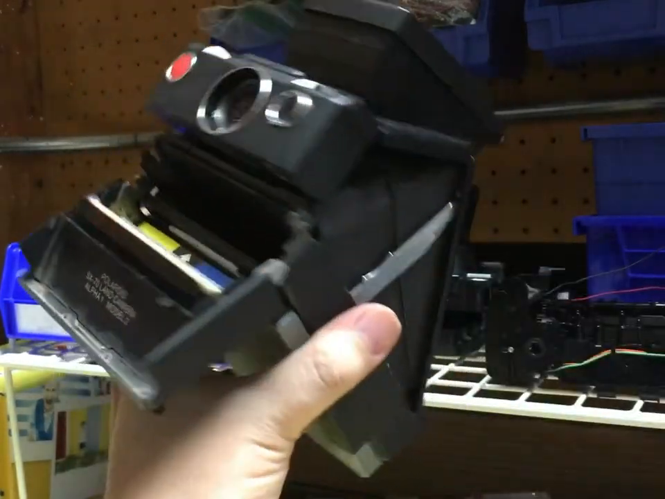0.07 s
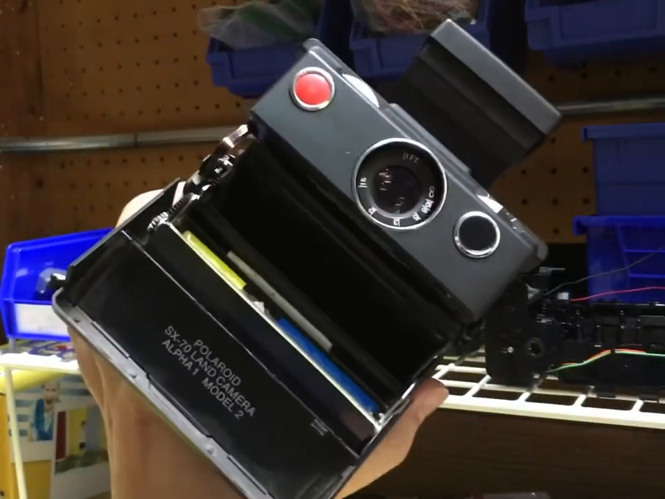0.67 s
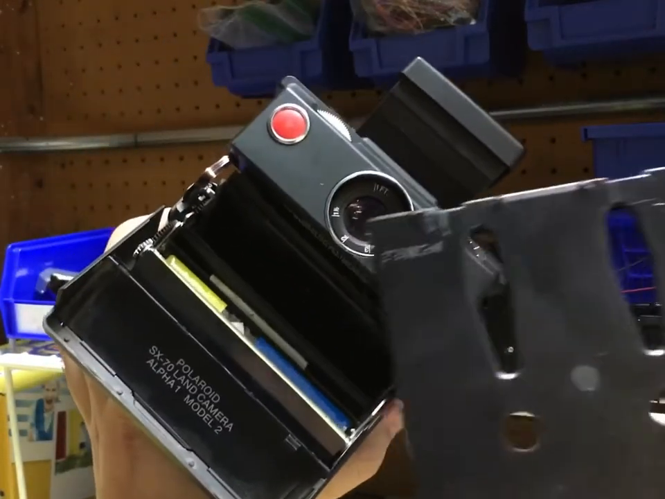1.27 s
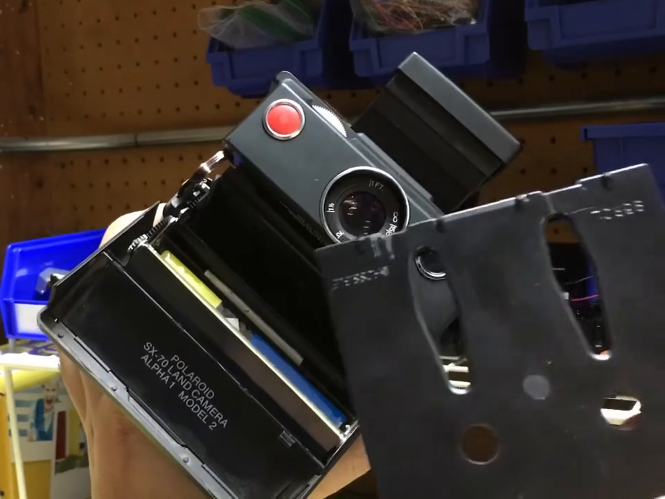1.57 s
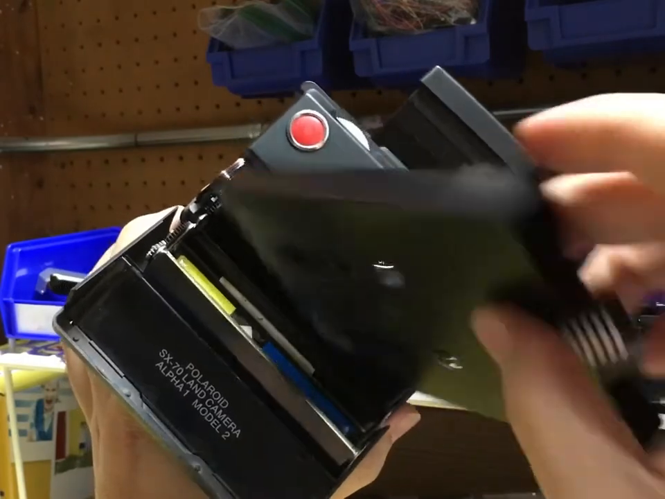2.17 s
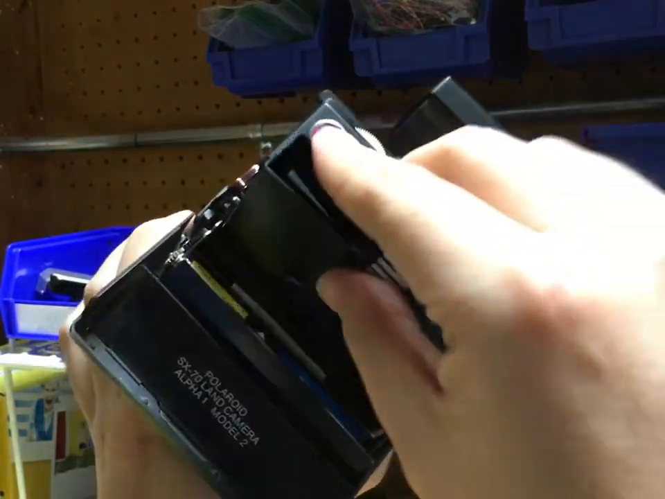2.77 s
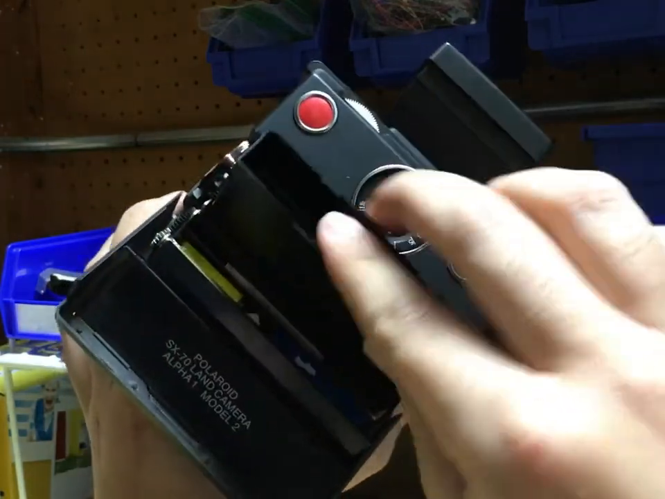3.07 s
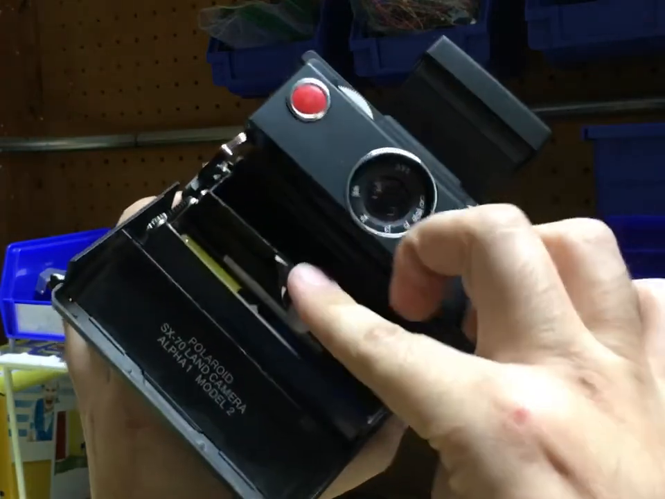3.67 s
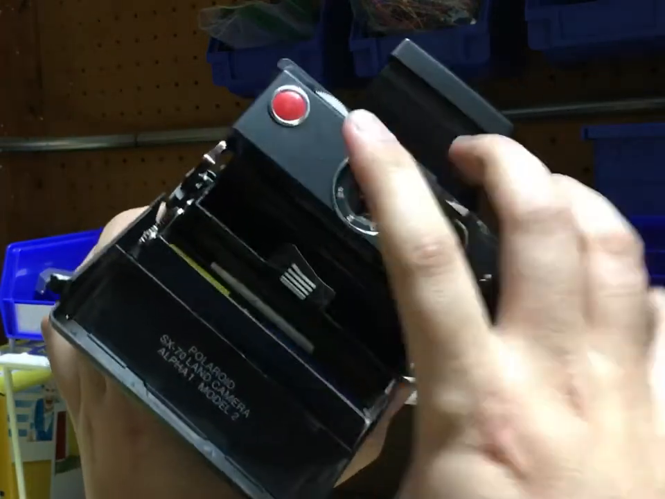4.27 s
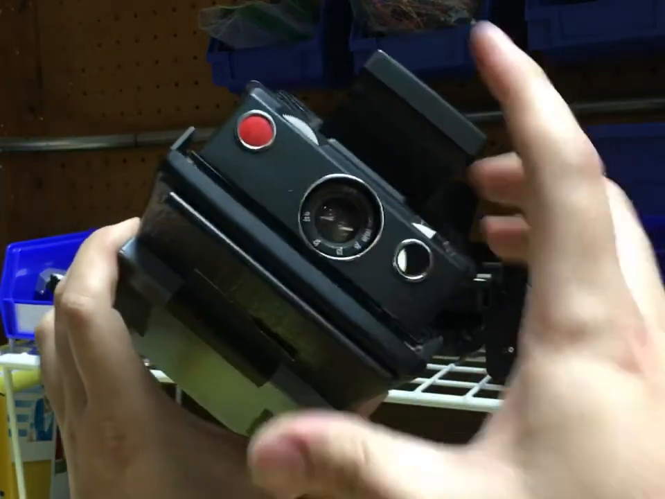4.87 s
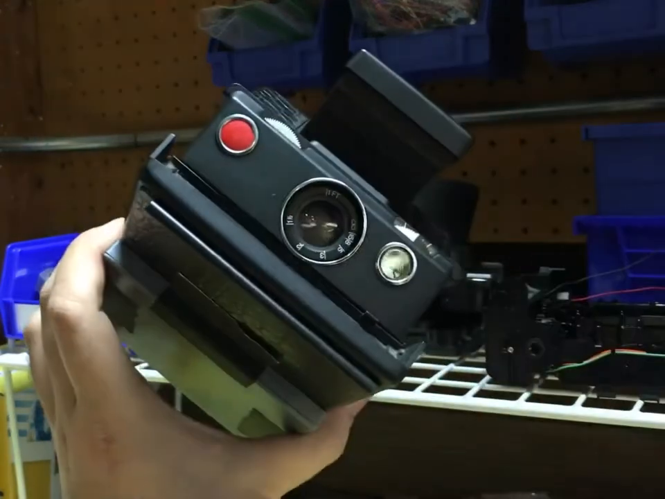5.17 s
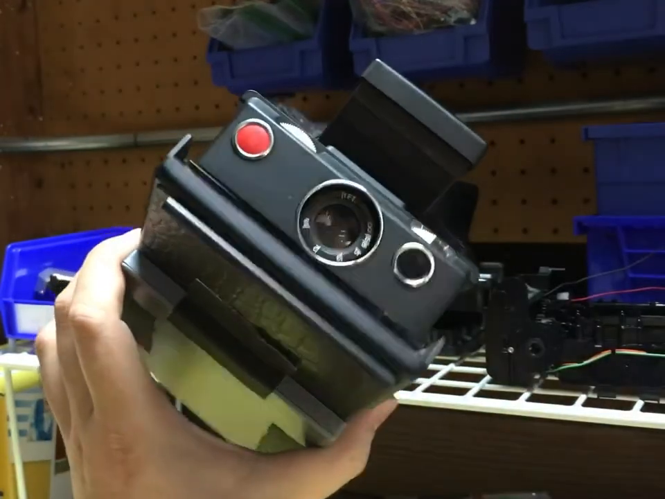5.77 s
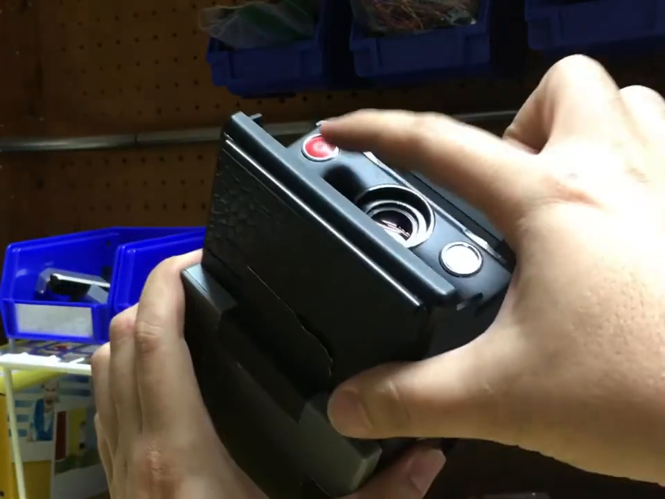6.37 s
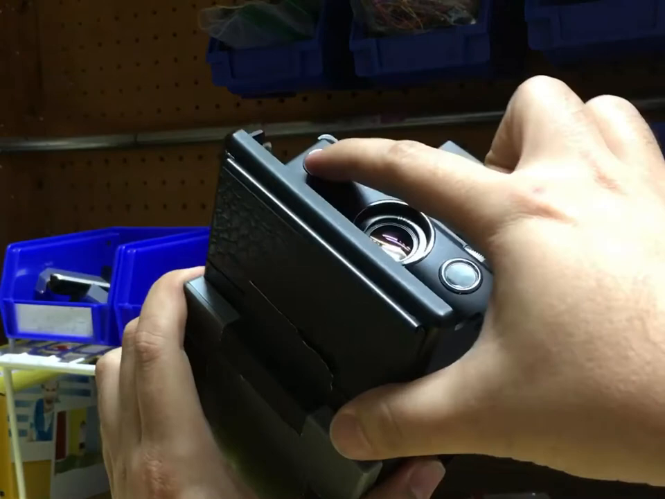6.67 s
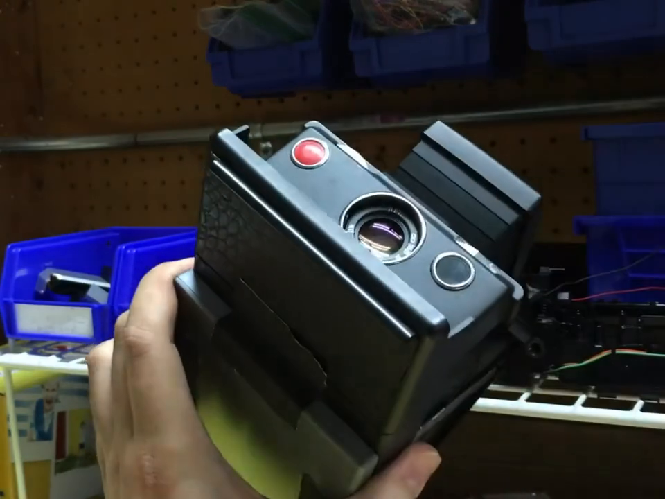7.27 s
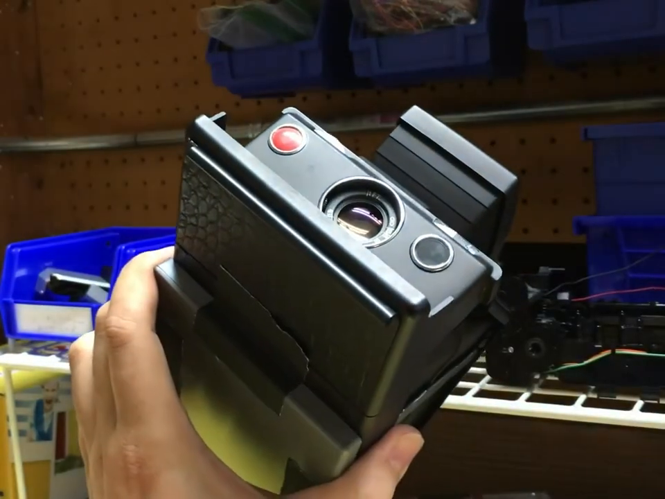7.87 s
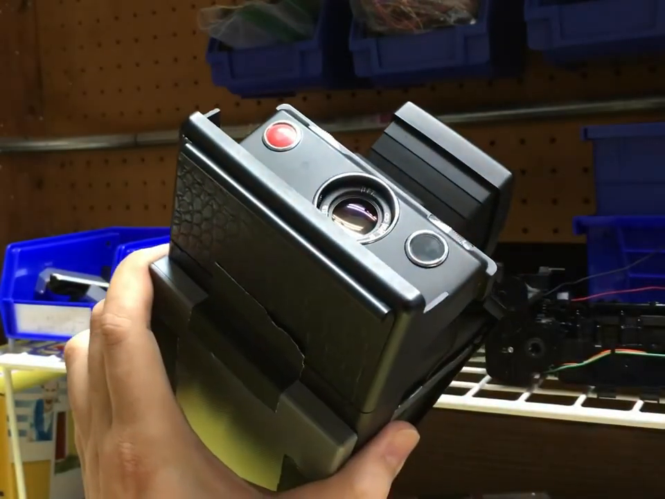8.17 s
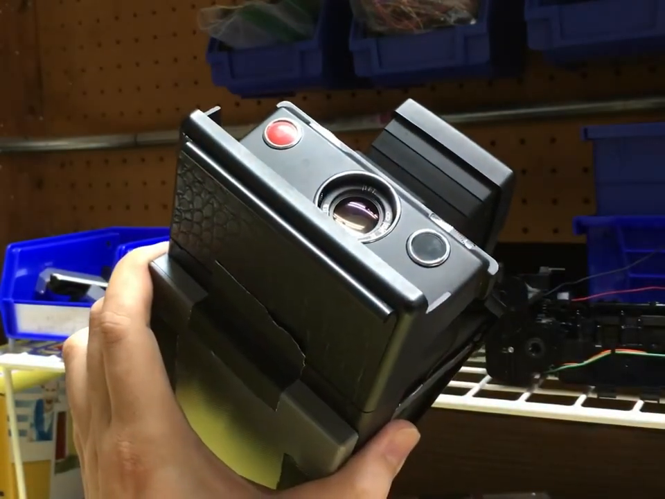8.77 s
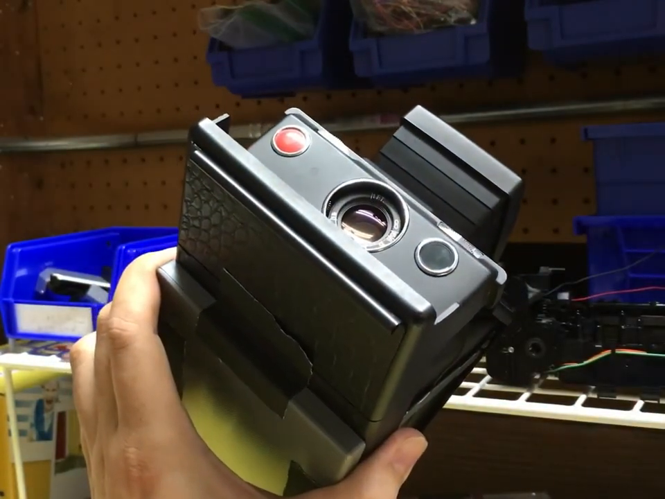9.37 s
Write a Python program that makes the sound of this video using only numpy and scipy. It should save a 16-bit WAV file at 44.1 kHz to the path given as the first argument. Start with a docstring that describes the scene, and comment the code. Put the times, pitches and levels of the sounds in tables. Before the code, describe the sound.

Light plastic scrapes and uneven clicks come from close by as a battery holder is pushed into an instant camera. A hard snap closes the door and sets off a bright, whining gear rattle that stops with a sharp tick. A short motor burst and a few knocks follow. After a moment of quiet workshop hum, the shutter ticks and the motor whirs again.

```python
"""A small workshop, bench equipment humming and whining faintly. Close up, a folding instant camera is
handled: its door drops open, a plastic battery holder scrapes and clicks into the slot, the door snaps
shut. Each contact excites the crowded modes of the plastic shell. A small motor then drives the gear
train in four runs, its teeth whining and rattling through the housing, with bright shutter ticks and
low mirror thuds."""
import sys
import numpy as np
from scipy import signal
from scipy.fft import rfft, irfft, next_fast_len
from scipy.io import wavfile
from scipy.ndimage import map_coordinates

SR = 44100
rng = np.random.default_rng(int(sys.argv[2]) if len(sys.argv) > 2 else 0)


def dump_mix(stems):
    """Bounce the given channels to the path in sys.argv[1] as a 16-bit WAV at rate SR."""
    frames = np.atleast_2d(stems).T  # one column per channel
    limited = np.clip(frames, -1, 1)  # hard clip at full scale
    pcm = np.round(limited * 32767).astype(np.int16)
    wavfile.write(sys.argv[1], SR, pcm)


N = 420273
TIME = np.arange(N) / SR


def from_db(db):
    """Decibels to gain."""
    return 10 ** (np.asarray(db) / 20)


def rms_one(x):
    """Scale to unit rms."""
    return x / np.sqrt(np.mean(x ** 2) + 1e-20)


def cut(x, hz, kind, order=2):
    """Causal low-, high- or band-pass."""
    sos = signal.butter(order, np.clip(hz, 10, .45 * SR), kind, fs=SR, output="sos")
    return signal.sosfilt(sos, x + 1e-18)


def drift(rate):
    """Smooth random wander, rms 1, through `rate` points a second."""
    knots = rng.standard_normal(N // 20)
    return rms_one(map_coordinates(knots, [TIME * rate + 2], order=3, mode="nearest"))


def noise(spectrum):
    """Noise of the given colour, rms 1."""
    hz, db = np.transpose(spectrum)
    size = next_fast_len(N)
    bins = np.arange(size // 2 + 1) * SR / size
    colour = from_db(np.interp(np.log(bins + 1), np.log(hz), db))
    return rms_one(irfft(rfft(rng.standard_normal(size)) * colour, size)[:N])


def resonance(x, hz, width):
    """One resonance, gain 1 at its top."""
    r = np.exp(-np.pi * width / SR)
    feedback = [1, -2 * r * np.cos(2 * np.pi * hz / SR), r * r]
    return signal.lfilter(np.array([1, 0, -1]) * (1 - r * r) / 2, feedback, x + 1e-18)


def resonate(x, peaks):
    """The sound plus what it excites in a few resonances."""
    return x + sum(from_db(db) * resonance(x, hz, width) for hz, width, db in peaks)


def diffuse(x, t60, top_hz, gap_s):
    """A tail of dense reflections, its impulse response of unit energy."""
    t = TIME[:SR // 2]
    reflections = rng.standard_normal(len(t)) * from_db(-60 * t / t60) * (t > gap_s)
    tail = cut(reflections, top_hz, "low", order=1)
    return signal.fftconvolve(x, tail / np.sqrt(np.sum(tail ** 2)))[:N]


def swell(age, length, attack_s, release_s):
    """Envelope that rises, holds for the given length and dies away."""
    return (1 - np.exp(-age / attack_s)) * np.exp(-np.maximum(age - length, 0) / release_s)


def decays(times, levels_db, t60s, rise=0.00077):
    """Envelope of fast-rising blows that die away; overlaps add in power."""
    power = np.zeros(N)
    for s, db, t60 in np.broadcast(times, levels_db, t60s):
        tail = power[int(s * SR):][:SR // 2]
        t = TIME[:len(tail)]
        tail += (from_db(db - 60 * t / t60) * (1 - np.exp(-t / rise))) ** 2
    return np.sqrt(power)


def mode(s, hz, db, t60):
    """One struck mode, ringing from time s for half a second at most."""
    out = np.zeros(N)
    tail = out[int(s * SR):][:SR // 2]
    t = TIME[:len(tail)]
    tail += from_db(db - 60 * t / t60) * np.sin(2 * np.pi * hz * t)
    return out


def workshop(air_db=-53, throb_hz=56.8):
    """Room tone: still air, bench hum and a thin whine; a second low hum beats with the first."""
    # colour of the air: (frequency [Hz], relative level [dB])
    air_colour = [(25, -16), (45, 13.5), (62, 19.5), (80, -4), (130, 10), (170, -9), (280, 2.5), (450, -10),
                  (800, -10.5), (1200, -7.5), (2800, -3), (4800, -12.5), (6000, -12), (9500, -18),
                  (15600, -8.5)]
    # bench hum and whine: (frequency [Hz], rms level [dB])
    bench_tones = [(60, -52.5), (123.8, -57), (1130, -61), (2261, -70.5), (3012, -71)]
    # fader curve of the second hum: (time [s], rms level [dB])
    throb_curve = [(0, -62), (4.5, -61), (5.8, -57), (6.4, -50), (7.3, -51), (9.5, -54)]
    air = noise(air_colour)
    air *= from_db(air_db) / np.std(cut(air, 300, "high", order=4))  # air_db is the level above 300 Hz
    hum = sum(from_db(db) * np.sin(2 * np.pi * hz * TIME + 0.92 * drift(4.0)) for hz, db in bench_tones)
    throb = from_db(np.interp(TIME, *np.transpose(throb_curve))) * np.sin(2 * np.pi * throb_hz * TIME)
    return air + np.sqrt(2) * (hum + throb)


def shell_bands():
    """The crowded modes of the plastic shell as bass, mids and treble noise, rms 1 each."""
    # shell resonances: (frequency [Hz], width [Hz], gain [dB])
    shell_peaks = [(1060, 240, 6.5), (1830, 370, -4), (2840, 70, 2.5), (4030, 2100, -1), (5660, 610, 1),
                   (6700, 570, 1), (8900, 660, -1.5), (12600, 3100, 0.5)]
    dense = resonate(rng.standard_normal(N), shell_peaks)
    bass = cut(dense, [170, 700], "band")
    mids = cut(dense, [750, 3500], "band", order=3)
    treble = cut(dense, 6400, "high")
    return rms_one(bass), rms_one(mids), rms_one(treble)


def rubbing(shell, grain_db=1.0, slip_db=2.0, bass_db=-7, edge_db=5, edge_width_hz=260):
    """Surfaces catch and slip in uneven grains that excite the shell and the edge being rubbed."""
    # hands and holder slide: (start [s], length [s], treble [dB], mids [dB], edge ring [Hz])
    strokes = [(0, 0.097, -44, -45, 3000), (0.131, 0.044, -52, -42.5, 2680), (0.24, 0.027, -54, -50, 1750),
               (0.345, 0.021, -48, -46, 1400), (0.392, 0.019, -51, -50, 1500),
               (0.418, 0.2, -46.5, -51, 3660), (0.559, 0.077, -39, -35.5, 3700),
               (0.759, 0.08, -46.5, -54.5, 2870), (1.752, 0.029, -50, -50.5, 1800),
               (1.825, 0.11, -48, -53.5, 3600), (1.949, 0.0053, -35.5, -45, 3600),
               (2.068, 0.022, -36, -37.5, 3000), (2.456, 0.027, -53, -51, 3650),
               (2.598, 0.099, -43.5, -44, 1880), (2.7, .028, -36, -42, 1870),
               (2.828, 0.056, -54.5, -51, 1780), (2.903, 0.061, -46, -49.5, 1930),
               (3.025, 0.029, -43, -49, 1600), (3.106, 0.084, -46.5, -51, 1570),
               (3.201, 0.013, -42, -49, 1900), (3.313, 0.024, -51, -56, 1050),
               (3.349, 0.0068, -43, -50, 2780), (3.476, .028, -38, -47.5, 1900),
               (3.509, 0.006, -46, -35, 1860), (3.54, 0.059, -54, -56, 930),
               (4.353, 0.094, -54, -53.5, 1810)]
    # palm and fingers shift their grip: (middle [s], half length [s], level [dB])
    grips = [(0.423, 0.17, -48), (3.107, 0.35, -59.5)]
    bass, mids, treble = shell
    body = mids + from_db(bass_db) * bass
    grains = rms_one(from_db(grain_db * drift(700) + slip_db * drift(90)))
    out = np.zeros(N)
    for s, length, treble_db, mids_db, edge_hz in strokes:
        on = slice(int(s * SR), int(s * SR) + SR // 3)
        pressure = grains[on] * swell(TIME[:SR // 3], length, attack_s=0.0043, release_s=0.01)
        scrape = pressure * (from_db(treble_db) * treble[on] + from_db(mids_db) * body[on])
        out[on] += resonate(scrape, [(edge_hz, edge_width_hz, edge_db)])
    grip = sum(from_db(db) * np.exp(-((TIME - s) / half) ** 2) for s, half, db in grips)
    return out + grip * rms_one(cut(bass, 250, "low"))


def taps(shell, per_s=26, softest_db=-61, spread_db=8, treble_db=-5, bass_db=-3, ring_db=-2,
         low_hz=1100, high_hz=2100):
    """Light, uneven taps of the holder in its slot, each with a short ring of its own."""
    # fingers press the holder home: (start [s], end [s])
    fumble = (2.75, 3.75)
    start, end = fumble
    bass, mids, treble = shell
    count = int(per_s * (end - start))
    jitter, size, pitch = rng.random((count, 3)).T
    times = start + (np.arange(count) + jitter) / per_s
    levels = softest_db - spread_db * np.log(size)  # mostly soft, a few stand out
    ring_hz = low_hz * (high_hz / low_hz) ** pitch
    plastic = mids + from_db(treble_db) * treble + from_db(bass_db) * bass
    rings = sum(mode(*ring, t60=0.11) for ring in zip(times, ring_hz, levels + ring_db))
    return plastic * decays(times, levels, t60s=0.029) + rings


def knocks(shell, crack_db=-7, treble_db=-11, mids_db=1, bass_db=2, rise_s=0.0024):
    """Plastic hits plastic: a sharp crack, the shell's brief clatter and the ring of the struck part."""
    # knocks before the band trims: (time [s], level [dB], bass re level [dB], mids re level [dB],
    # ring [Hz], ring re mids [dB], clatter t60 [s])
    hits = [(0.1091, -9.5, -17, -10.5, 1646, -3, 0.11), (0.1302, -7, -21, -19.5, 4700, 9.5, 0.047),
            (0.5753, -31, -23, -7, 3500, 12, 0.065), (0.604, -11.5, -14, -17, 2940, -6, 0.064),
            (0.6294, -29.5, -4, -4, 3500, 2, 0.04), (1.9913, -16.5, -12, -8.5, 979, 11, 0.055),
            (2.0547, -13, -16, -17.5, 4160, -1, 0.051), (2.0842, -12.5, -22, -13, 1610, -1.5, 0.055),
            (2.123, -24.5, -6, -6, 1590, -4, 0.059), (2.337, -28, -5, -2, 950, -5, 0.05),
            (2.4985, -8, -15, -16.5, 5630, 11, 0.068), (2.651, -26.5, -36, -3.5, 1070, -6, 0.042),
            (2.7205, -23.5, -37, -3.5, 1710, -0.5, 0.071), (3.3615, -20.5, -33, -23.5, 2810, 16.5, 0.018),
            (3.5071, -11, -25, -5, 1007, -4, 0.04), (3.964, -16, -24, -11, 1944, 3, 0.055),
            (4.412, -17.5, -28, -14.5, 1130, -6, 0.025), (4.434, -21, -11.5, -11, 1090, -25, 0.091),
            (4.5219, 1, -17, -10.5, 922, -10.5, 0.059), (4.53, -10.5, -13, -3.5, 2116, 1.5, 0.026),
            (4.536, -5, -21, -24, 2730, 15, 0.034), (4.6906, -19, -11.5, -11, 5440, -6, 0.14),
            (4.781, -12, -12, -7.5, 5930, -3, 0.05), (6.7502, -9, -20, -15.5, 5080, -14, 0.083),
            (6.8336, -11.5, -14, -13, 1406, -6, 0.093), (6.911, -24.5, -35, -31, 5230, -7, 0.06)]
    s, level, bass_rel, mids_rel, ring_hz, ring_db, t60 = np.transpose(hits)
    bass, mids, treble = shell
    crack = treble * decays(s, level + crack_db, t60s=0.015, rise=0.00056)
    clatter = treble * decays(s, level + treble_db, t60, rise_s)
    clatter += mids * decays(s, level + mids_rel + mids_db, t60, rise_s)
    weight = bass * decays(s, level + bass_rel + bass_db, t60s=0.068, rise=0.011)
    # edges graze each other just before they snap home
    graze = treble * decays(s - .009, np.minimum(level - 27, -46), t60s=.05)
    ring_t60 = 0.071 * np.minimum(1, 1200 / ring_hz)  # high rings die sooner
    rings = sum(mode(*ring) for ring in zip(s, ring_hz, level + mids_rel + ring_db, ring_t60))
    return crack + clatter + weight + graze + rings


def thuds(modes_db=-9, push_db=-8):
    """Door and mirror thud: low body modes, a boom and a push of noise; a softer contact is duller."""
    # blows: (time [s], level [dB], contact cut-off [Hz], boom [Hz], boom re level [dB])
    blows = [(.111, -31.5, 1300, 574, 8.5), (4.527, -20.5, 495, 185, -1), (4.78, -18, 850, 164, -7.5),
             (5.214, -25.5, 650, 383, 2), (5.232, -24, 650, 230, -18), (6.833, -15, 820, 173, -18),
             (7.31, -23.5, 680, 410, 0)]
    # modes of the camera body: (frequency [Hz], relative level [dB], t60 [s])
    body_modes = [(179, -0.5, 0.093), (211, 1, 0.056), (271, 1.5, 0.098), (412.5, -1, 0.047),
                  (480, -10, 0.098), (580, 6.5, 0.018), (704, 1.5, 0.086), (1090, -17.5, 0.093)]
    dull_noise = noise([(90, -36), (190, 7), (600, -8.5), (1500, -6.5), (8000, -8)])
    out = np.zeros(N)
    for s, db, contact_hz, boom_hz, boom_db in blows:
        body = sum((-1) ** k * mode(s, hz, db + modes_db + level + rng.normal(0, 1), t60)
                   for k, (hz, level, t60) in enumerate(body_modes))
        boom = mode(s, boom_hz, db + boom_db, t60=0.056)
        push = dull_noise * decays(s, db + push_db, t60s=0.14)
        out += cut(body + boom + push, contact_hz, "low", order=3)
    return out


def ticks(crack_db=-4, sizzle_db=-11, ring_hz=2520, ring_db=-22):
    """Small steel parts snap: a very bright crack, a brief sizzle and one short ring."""
    # shutter and switch ticks: (time [s], level [dB])
    snaps = [(6.0932, -4.5), (6.137, -23.5), (6.5822, -16.5), (6.5912, -6.5), (8.0895, -17.5), (8.098, -5)]
    s, level = np.transpose(snaps)
    steel = noise([(200, -14), (1300, -18), (2000, -0.5), (4000, -2.5), (5500, 4.5), (9000, 4),
                   (14000, 7.5)])
    crack = decays(s, level + crack_db, t60s=0.015, rise=0.00051)
    sizzle = decays(s, level + sizzle_db, t60s=0.067)
    rings = sum(mode(at, ring_hz, db + ring_db, t60=0.038) for at, db in snaps)
    return steel * (crack + sizzle) + rings


def spring(at_s=6.095):
    """A spring rings on as the first long motor run ends."""
    # spring modes: (frequency [Hz], level [dB], t60 [s])
    spring_modes = [(1750, -55, 1.55), (2880, -54.5, 1.5)]
    return sum(mode(at_s, *ring) for ring in spring_modes)


def wander(age, rate):
    """Random wander along a motor run, through `rate` points a second."""
    return np.interp(age * rate, np.arange(2000), rng.standard_normal(2000))


def gear_whine(age, mesh_hz, level_db, rotor_db, tilt_db, full_hz=1196, rotor_ratio=.15, growl_db=-5):
    """Meshing teeth sing over the rotor's low tone, louder with speed."""
    # drive tones: (multiple of the mesh rate, relative level [dB], phase wander [rad])
    orders = [(.45, -12.5, 0.13), (.5, -13.5, 0.13), (0.584, -14.5, 0.58), (1, -1, 0.34),
              (1.065, -9.5, 0.96), (1.5, 0, 1.22), (1.901, -12.5, 1.2), (2, -3.5, 0.82), (2.5, -3.5, 0.87)]
    unsteady = .002 + .25 * np.exp(-age / .08)  # the teeth mesh unevenly while spinning up
    phase = 2 * np.pi * np.cumsum(mesh_hz * (1 + unsteady * wander(age, 298.4))) / SR
    tones = from_db(rotor_db) * np.sin(rotor_ratio * phase)
    for multiple, db, loose in orders:
        load_db = tilt_db * max(np.log2(multiple), 0)  # a harder load brightens the upper tones
        gain = from_db(db + load_db + 3.14 * wander(age, 34.96))
        tones += gain * np.sin(multiple * phase + loose * wander(age, 110))
    speed_db = 5 * np.log2(mesh_hz / full_hz)
    engaged = 1 - np.exp(-age / .09)  # the tone forms once the backlash is taken up
    # the first gear growls at half the mesh rate while it speeds up
    growl = from_db(growl_db) * np.exp(-age / 0.074) * np.sin(phase / 2)
    return from_db(level_db) * (from_db(speed_db) * engaged * tones + growl)


def gear_chatter(age, level_db, bounce_hz=94, settle_s=0.021, grain_db=0.5, attack_s=0.001):
    """Envelope of the rattle: the gears bounce in their backlash until the load settles."""
    pulses = 1.8 * np.exp(-4 * (age * bounce_hz % 1))
    bounce = 1 + np.exp(-age / settle_s) * (pulses - 1)
    return from_db(level_db + grain_db * wander(age, 610)) * (1 - np.exp(-age / attack_s)) * bounce


def housing(gears, age, wander_db=6, wanders_per_s=8.9):
    """The gears excite housing resonances, each strongest at its own point of the cam's turn."""
    # resonances: (frequency [Hz], width [Hz], gain [dB], strongest after the start [s], half length [s])
    housing_peaks = [(2285, 95, -0.5, 0.54, 1), (4300, 156, -3, 0.63, 1.5), (6100, 83, 1.5, .2, 0.63),
                     (6460, 370, 2, 1.3, 0.27), (9600, 590, -0.5, .28, .33), (14300, 900, -8, 1.1, 0.39)]
    out = np.zeros(len(age))
    for hz, width, db, at, span in housing_peaks:
        gain = from_db(db + wander_db * wander(age, wanders_per_s)) * np.exp(-((age - at) / span) ** 2)
        out += resonance(gears * gain, hz, width)
    return out


def motor(run, rattle, start_lag=.42, spin_up_s=.045, coast_s=0.086, fade_t60=0.095, panel_width_hz=220):
    """One run: the motor spins up to the rate the load allows and coasts down when the power is cut."""
    # gear mesh rate that the load allows, one curve for each of the two cycles: (time [s], rate [Hz])
    mesh_curves = [
        [(4.91, 1150), (5.0, 1207), (5.14, 1265), (5.3, 1203), (5.48, 1227), (5.9, 1190), (6.04, 1152),
         (6.1, 1106)],
        [(8.22, 1089), (8.4, 1148), (8.56, 1187), (8.72, 1126), (9.03, 1114), (9.22, 1165), (9.32, 1128),
         (9.4, 1169), (9.54, 1118)],
    ]
    start, stop, rattle_db, whine_db, rotor_db, tilt_db, panel_hz, panel_db = run
    on = (TIME >= start) & (TIME < stop + fade_t60)
    age, coasting = TIME[on] - start, np.maximum(TIME[on] - stop, 0)
    allowed_hz = np.interp(TIME[on], *np.concatenate(mesh_curves).T)
    mesh_hz = allowed_hz * (1 - start_lag * np.exp(-age / spin_up_s)) * np.exp(-coasting / coast_s)
    whine = gear_whine(age, mesh_hz, whine_db, rotor_db, tilt_db)
    teeth = gear_chatter(age, rattle_db) * rattle[on]
    gears = (teeth + whine) * from_db(-60 * coasting / fade_t60)
    out = np.zeros(N)
    out[on] = resonate(gears, [(panel_hz, panel_width_hz, panel_db)]) + housing(gears, age)
    return out


def drive(casing_db=-8):
    """Two cycles of the gear train: a short run lifts the mirror, then a long one turns the rollers."""
    # colour of the rattling teeth: (frequency [Hz], relative level [dB])
    teeth_colour = [(100, -25), (400, -20.5), (650, -20.5), (880, -11.5), (1150, -7), (1480, -13.5),
                    (1750, -7.5), (2400, -8), (3200, -7.5), (3800, -1.5), (4800, -3), (6000, 2), (8000, 0),
                    (15500, 2)]
    # motor runs: (power on [s], power off [s], rattle [dB], whine [dB], rotor re whine [dB],
    # tilt of the upper tones [dB/octave], buzzing panel [Hz], panel gain [dB])
    runs = [(4.57, 4.706, -28, -40, -20, -2, 15180, 6), (4.745, 6.101, -25, -39.5, -11, -4.5, 12000, 0),
            (6.623, 6.761, -24.5, -40, -20, 0, 5370, 5), (8.129, 9.6, -23.5, -40, -16.5, -3, 7220, -3)]
    teeth = cut(noise(teeth_colour), 16500, "low", order=8)
    # reflections inside the casing comb the rattle into narrow ridges
    casing = from_db(casing_db) * diffuse(teeth, t60=0.038, top_hz=12100, gap_s=0.00073)
    rattle = rms_one(teeth + casing)
    return sum(motor(run, rattle) for run in runs)


def scene(room_db=-18.5):
    """The camera sits dead centre over the room tone; bench and shelves add a short tail."""
    shell = shell_bands()
    camera = knocks(shell) + ticks() + thuds() + rubbing(shell) + taps(shell) + drive() + spring()
    room = from_db(room_db) * diffuse(camera, t60=0.37, top_hz=8150, gap_s=0.012)
    return np.tile(camera + room + workshop(), (2, 1))


def record(dry, cutoff_hz=15900):
    """Peaks clip at full scale, then a steep low-pass takes off the very top."""
    low_pass = signal.ellip(12, .1, 70, cutoff_hz, fs=SR, output="sos")
    return signal.sosfilt(low_pass, np.clip(dry, -1, 1))


dry = scene()
out = record(dry)
dump_mix(out)
```